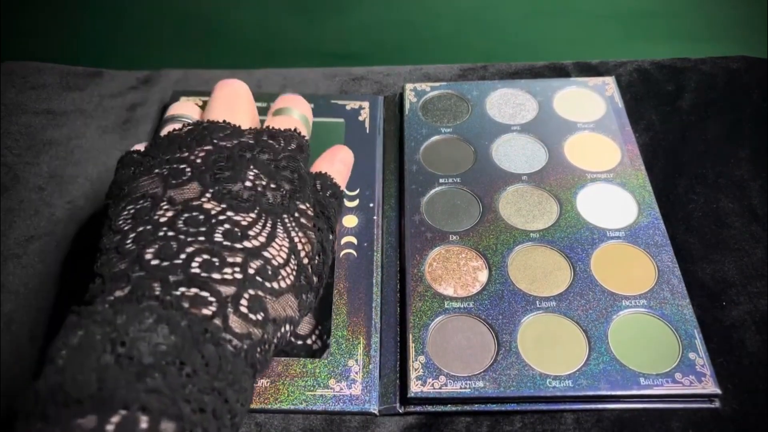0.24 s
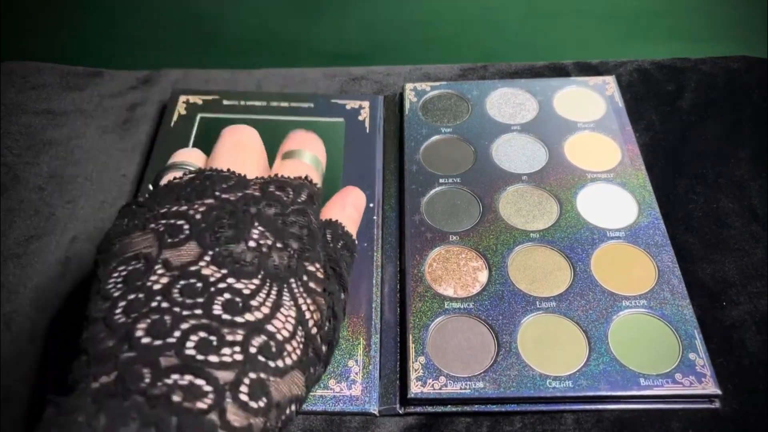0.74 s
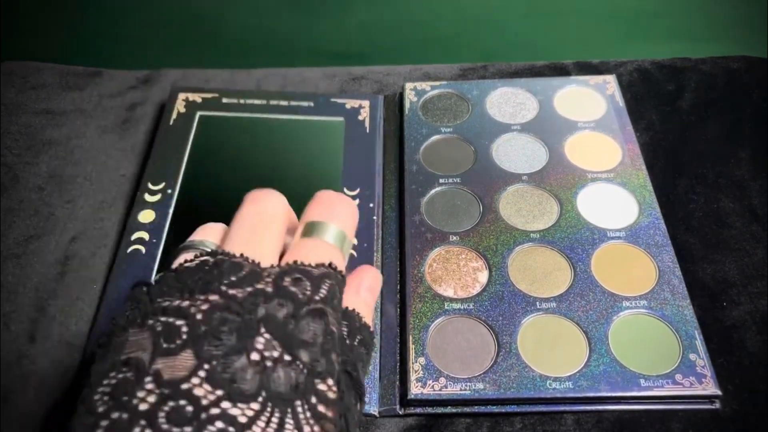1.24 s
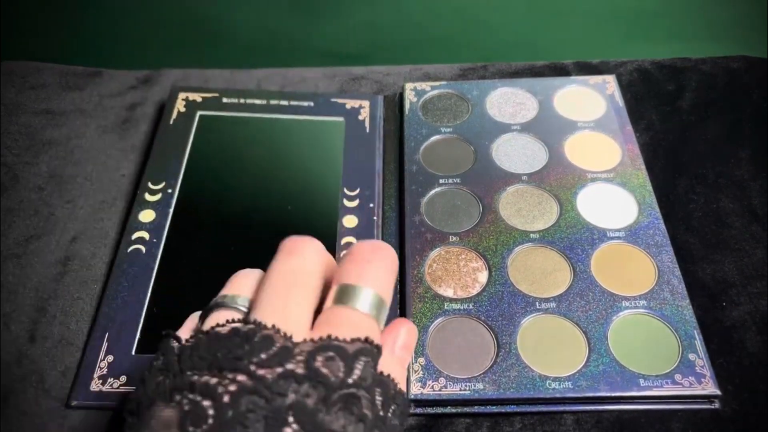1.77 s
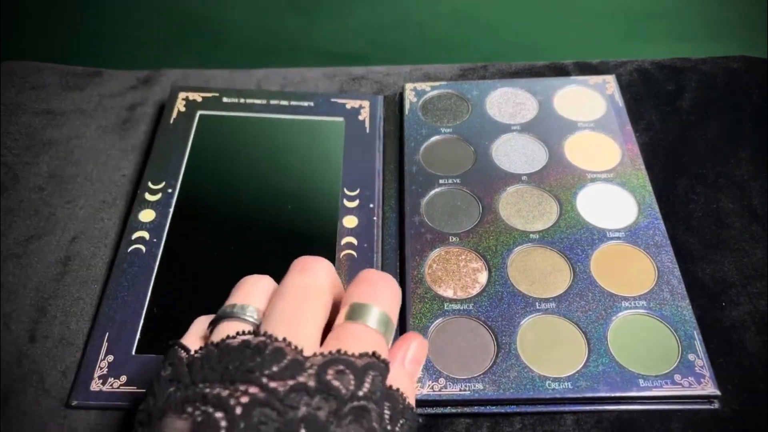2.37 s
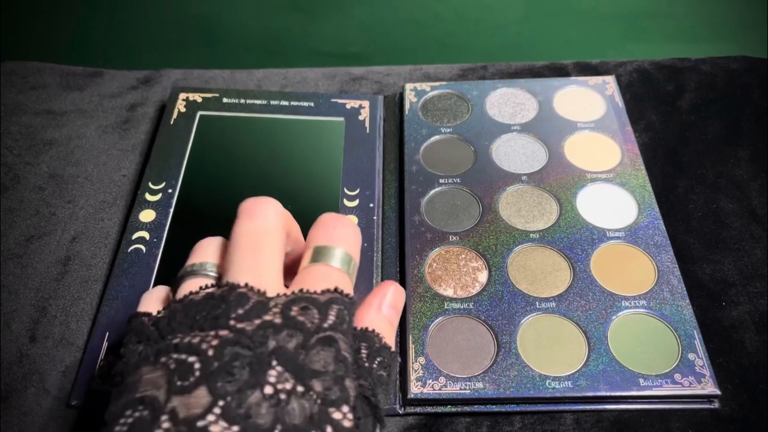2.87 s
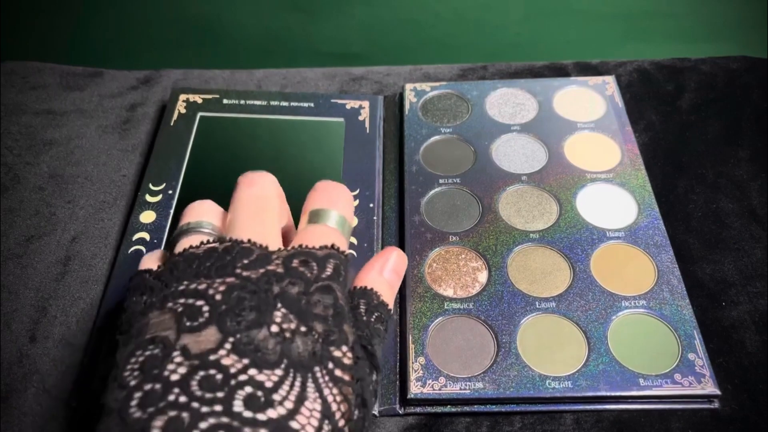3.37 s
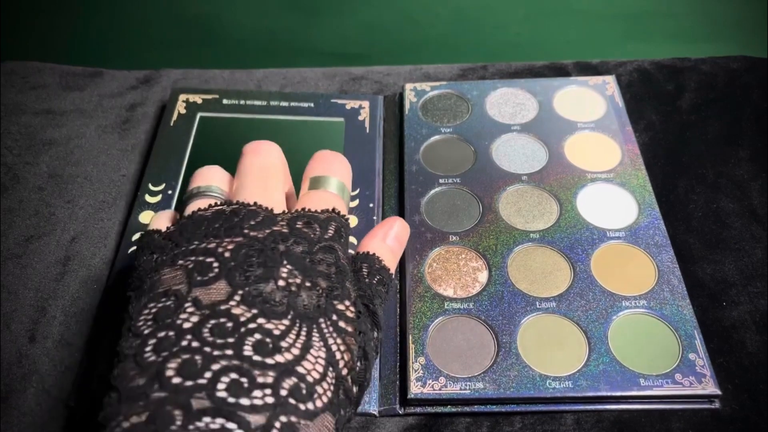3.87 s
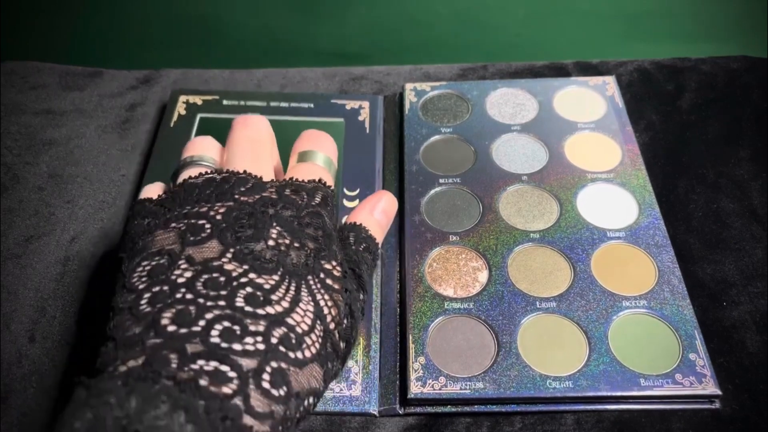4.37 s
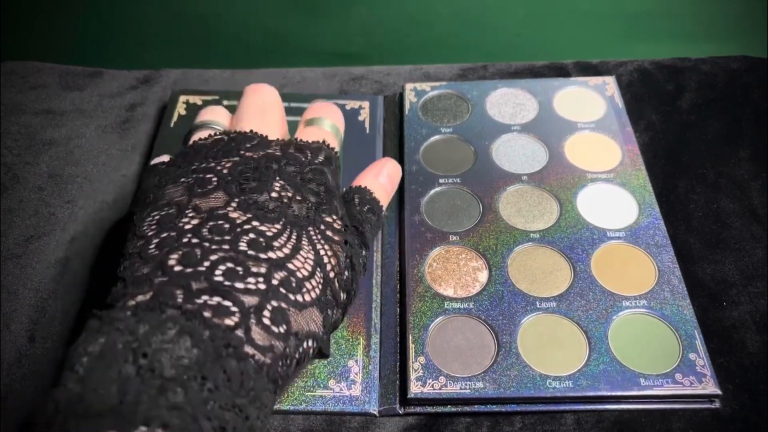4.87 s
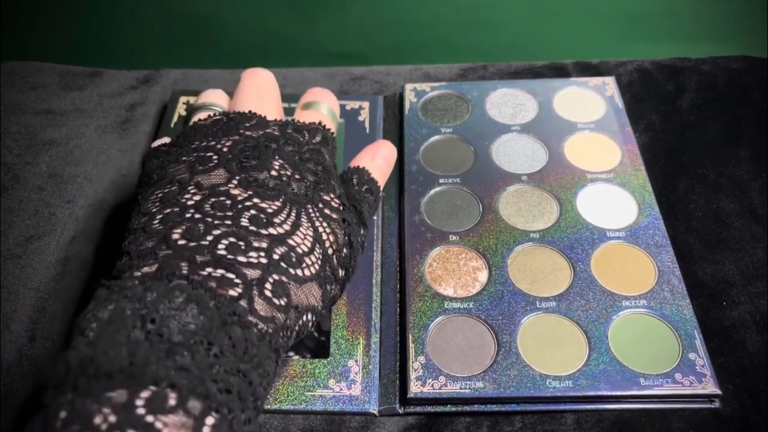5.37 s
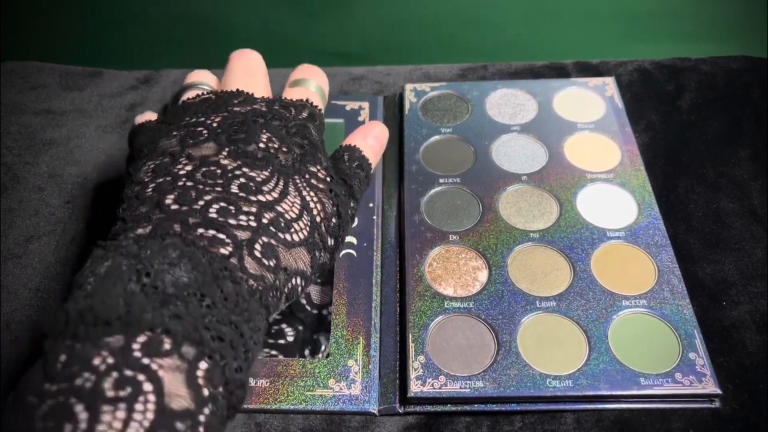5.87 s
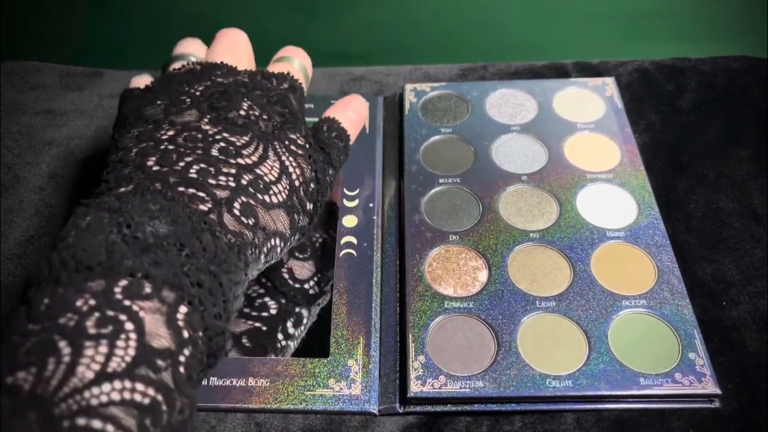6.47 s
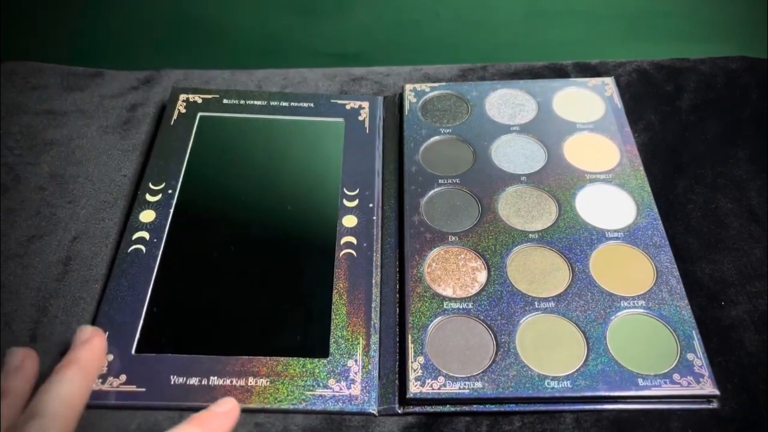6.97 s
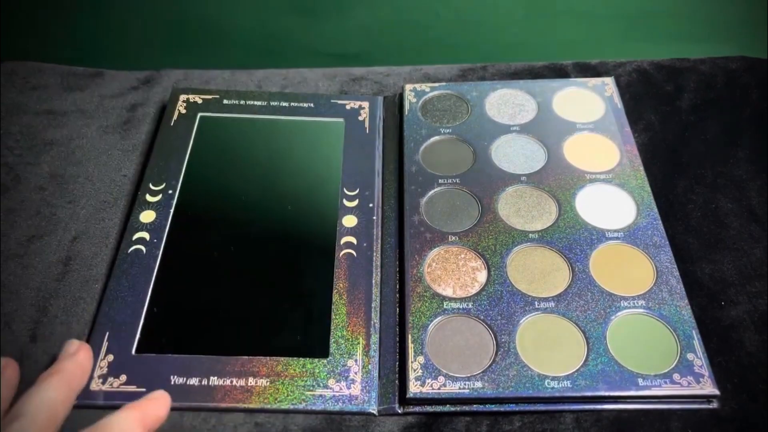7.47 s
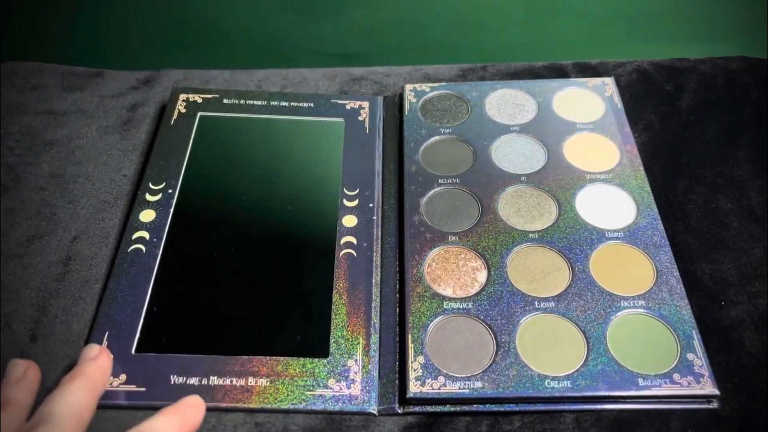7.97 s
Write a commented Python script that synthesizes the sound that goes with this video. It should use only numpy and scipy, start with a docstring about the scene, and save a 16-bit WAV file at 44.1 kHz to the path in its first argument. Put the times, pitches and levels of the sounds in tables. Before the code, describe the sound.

Irregular bursts of hollow, clicky nail taps on a thin board lid, then a light lace swish and a soft settling on cloth.

```python
"""Fingernails drum in quick, uneven clusters on the mirror lid of an open cardboard palette lying on cloth.
Each tap rocks the lid, knocks the damped board, rings the mirror briefly and clicks in the nail itself;
the hand travels down the lid and up again, and the place it strikes sets the pitch and colour of the knock.
Heard close and nearly mono in a small, dry room with a faint hum; the lace sleeve swishes as the hand
leaves, then the hand settles on the cloth. Swinging sines make the rocking, shaped pulses and noise the rest."""
import sys
import numpy as np
from scipy import signal
from scipy.fft import rfft, irfft
from scipy.io import wavfile
from scipy.ndimage import map_coordinates

SR = 44100
rng = np.random.default_rng(int(sys.argv[2]) if len(sys.argv) > 2 else 0)


def unload_wav(signal):
    """Save mono or channel-first audio to the path in sys.argv[1] as 16-bit WAV at rate SR, clipped to [-1, 1]."""
    wavfile.write(
        sys.argv[1],
        SR,
        np.round(np.clip(np.atleast_2d(signal).T, -1, 1) * 32767).astype(np.int16),
    )


N = 362943
SIZE = 8192  # samples in one tap with its room tail
HZ = np.maximum(np.arange(SIZE // 2 + 1) * SR / SIZE, 1)  # frequency of each bin of a tap
TOP_HZ = 15900
AIR_DB, AIR_SIDE_DB = -77 + 10, -77
HUM_HZ, HUM_DB = 190, -75.5
BOARD_WIDTH_HZ = 239
# the lid rocks on the cloth in a slow and a fast mode
FAST_ROCKING_HZ, SLOW_T60_S, FAST_T60_S = 89, 0.069, 0.085
# dB gained per dB: a square hit and a hard nail drive the mirror; a square hit also drives the tick
MIRROR_PER_KNOCK, MIRROR_PER_CLICK, TICK_PER_KNOCK = 0.29, 0.73, 0.14
# the squarer the hit, the lower the mirror rings and the higher the nail clicks
MIRROR_HZ_PER_DB, NAIL_HZ_PER_DB = -5, 39


def undb(db):
    """Decibels to gain."""
    return 10 ** (np.asarray(db) / 20)


def unit(x):
    """Scale to an rms of one."""
    return x / np.sqrt(np.mean(x ** 2))


def curve(rows):
    """Gain over time, interpolated in dB between (time [s], level [dB]) rows."""
    return undb(np.interp(np.arange(N) / SR, *np.transpose(rows)))


def colour(points, hz):
    """Gain over frequency, from (frequency [Hz], level [dB]) points on a logarithmic frequency axis."""
    at, db = np.transpose(points)
    return undb(np.interp(np.log(np.maximum(hz, 1)), np.log(at), db))


def noise(points):
    """Noise of rms one whose spectrum follows the points."""
    white = rfft(rng.standard_normal(N))
    hz = np.arange(N // 2 + 1) * SR / N
    return unit(irfft(white * colour(points, hz), N))


def wander(axis, step):
    """Smooth random values along an axis, a new one every step."""
    return map_coordinates(rng.standard_normal(1024), [axis / step], order=3, mode="wrap")


def background():
    """Room rumble and microphone hiss under a faint hum that wavers in phase and level."""
    # spectrum of the rumble and hiss: (frequency [Hz], relative level per Hz [dB])
    air = [(20, -8.5), (55, 0), (85, -8.5), (150, -14), (190, -3), (240, -12), (330, -18), (500, -22),
           (900, -31), (2000, -32), (6000, -39), (16000, -39.5)]
    t = np.arange(N) / SR
    phase = 2 * np.pi * HUM_HZ * t + 1.0 * wander(t, 0.04)
    hum = np.sin(phase) * undb(4.1 * wander(t, 0.15))
    return noise(air) * undb(AIR_DB) + unit(hum) * undb(HUM_DB)


def sleeve():
    """The moving hand rumbles softly, its lace rustles and slides off the lid, and it settles on the cloth."""
    # movement of hand and sleeve: (time [s], level [dB])
    movement = [(0, 3), (1, 1), (3, 3.5), (4.5, 2.5), (6.6, 1.5), (6.95, -4), (7.2, -4), (7.6, -8.5),
                (7.72, 1.5), (7.85, -8), (8.15, -6.5)]
    # sleeve sliding off the lid: (time [s], level [dB])
    swish = [(6.75, -100), (6.87, -79), (6.96, -74.5), (7.06, -81), (7.3, -99)]
    # the hand settling on the cloth: (time [s], level [dB])
    settling = [(7.7, -100), (8.0, -81), (8.15, -67.5), (8.25, -92)]
    t = np.arange(N) / SR
    rumble = noise([(15, -2.5), (32, 0.0), (70, -12.0), (150, -13.5), (400, -27.5), (2000, -63.5),
                    (16000, -81.5)])
    rustle = noise([(100, 0.5), (700, 5.5), (2000, -2.0), (6000, -4.5), (16000, -7.5)])
    slide = noise([(1000, -17.0), (4500, -8), (7500, -3), (10000, -12.5), (16000, -23)])
    brush = noise([(40, 2.5), (90, -5.0), (180, 2.5), (400, 2.5), (700, -18.5), (3000, -33.5), (16000, -50)])
    moving = rumble * undb(-63.0 + 4.5 * wander(t, 0.066))
    moving += rustle * undb(-77.0 + 0.61 * wander(t, 0.18))
    return moving * curve(movement) + slide * curve(swish) + brush * curve(settling)


def lid_at(s, table):
    """The lid's answer at the place that the hand has reached."""
    # where the fingers land: (time [s], place on the lid [0 near edge to 1 far edge])
    reach = [(0, 0.87), (.25, 0.67), (.7, 0.62), (1.2, .33), (1.8, 0.084), (2.45, 0.039), (2.9, 0.3),
             (3.35, 0.43), (3.85, 0.57), (4.3, .7), (5.35, 0.76), (5.72, 0.85), (5.9, 0.86), (6.8, 0.94)]
    place = np.interp(s, *np.transpose(reach))
    places, *columns = np.transpose(table)
    return [np.interp(place, places, column) for column in columns]


def rocking(slow_hz, fast_db, detune=0.035):
    """The lid sinks into the cloth and swings back: two decaying sines, the fast one set by the place hit."""
    t = np.arange(SIZE) / SR
    modes = [(slow_hz, SLOW_T60_S, 0), (FAST_ROCKING_HZ, FAST_T60_S, fast_db)]
    swing = np.zeros(SIZE)
    for (hz, t60, db), shift in zip(modes, rng.standard_normal(2)):
        decay = undb(db - 60 * t / t60)
        swing += decay * np.sin(2 * np.pi * hz * (1 + detune * shift) * t)
    onset = 1 - np.exp(-t / 0.002)
    return unit(swing * onset) / np.sqrt(SIZE)  # total energy of one


def resonances(modes, detune, scatter_db):
    """Gain of damped modes over frequency; each blow shifts them a little and may favour some."""
    power = 0
    for (hz, width, db), (shift, luck) in zip(modes, rng.standard_normal((len(modes), 2))):
        centre = hz * (1 + detune * shift)
        off = (HZ / centre - centre / HZ) * centre / width
        gain = undb(db + scatter_db * luck) / (1 + off ** 2) ** 1.13
        power = power + gain ** 2
    return np.sqrt(power)


def favour(hz, width_hz, rest_db):
    """The place of the blow drives the modes near one frequency harder than the rest."""
    return undb(rest_db) + 1 / (1 + ((HZ - hz) / width_hz) ** 2)


def strike(gain):
    """The sharpest causal pulse that has this spectrum (minimum phase, by folding the cepstrum)."""
    cepstrum = irfft(np.log(gain + 1e-4 * gain.max()))
    cepstrum[1:SIZE // 2] *= 2
    cepstrum[SIZE // 2 + 1:] = 0
    return irfft(np.exp(rfft(cepstrum)))


def tap(s, strength_db, rocking_db, flex_db, knock_db, click_db):
    """One nail landing: rocking minus a pulse of board, mirror and nail; levels are rms over 10 ms."""
    # pitches that a blow favours along the lid: (place [0-1], slow rocking [Hz], flex [Hz], board [Hz],
    # knock [Hz], mirror [Hz], nail [Hz])
    lid_pitch = [(0, 47.16, 333.7, 455, 870, 1663, 4100), (.3, 52, 184.3, 435.5, 914, 1874, 4750),
                 (.55, 46.4, 188.2, 486, 1045, 1530, 4400), (.8, 37, 224.4, 567, 1046, 1580, 4400),
                 (1, 63, 238, 360, 1150, 1720, 3300)]
    # levels along the lid; at the far end the nails land on their edges:
    # (place [0-1], fast rocking [dB], mirror [dB], tick [dB], top octave [dB])
    lid_level = [(0, -13.5, 2, -15.5, -4), (.3, -7.5, -2, -7.5, -7.5), (.55, -3, -5.5, -12, -3),
                 (.8, 8, 3.5, -10, 5), (1, -5, 0.5, -18.5, 2)]
    # resonances of the lid flexing, knocked and in its mirror: (frequency [Hz], width [Hz], relative level [dB])
    flex_modes = [(158.5, 84, 0), (240.3, 64, -3.5), (367.5, 170, -6)]
    knock_modes = [(825, 200, 2.5), (1098, 450, 0), (1330, 220, -2)]
    mirror_modes = [(1487, 440, 0.0092), (1852, 320, 0)]
    # contact click of a nail, and its higher tick: (frequency [Hz], relative level [dB])
    click_colour = [(1300, -20.5), (2100, 4), (2500, 6), (4000, -3.5), (5800, -3), (7500, -12),
                    (12000, -31.5)]
    tick_colour = [(4500, -18), (7200, 2), (9500, 0), (12500, -0.5), (16000, -13)]

    slow_hz, flex_hz, board_hz, knock_hz, mirror_hz, nail_hz = lid_at(s, lid_pitch)
    fast_db, mirror_db, tick_db, top_db = lid_at(s, lid_level)
    mirror_hz += MIRROR_HZ_PER_DB * knock_db
    nail_hz += NAIL_HZ_PER_DB * knock_db
    mirror_db += MIRROR_PER_KNOCK * knock_db + MIRROR_PER_CLICK * click_db
    tick_db += click_db + TICK_PER_KNOCK * knock_db

    flex = resonances(flex_modes, detune=0.072, scatter_db=2.5) * favour(flex_hz, 60, -7.5)
    board = resonances([(board_hz, BOARD_WIDTH_HZ, 0)], detune=0.012, scatter_db=0)
    knock = resonances(knock_modes, detune=0.02, scatter_db=0.0) * favour(knock_hz, 230, -13.5)
    knock /= np.hypot(1, (HZ / 1400) ** 10)  # soft cardboard damps its higher modes
    mirror = resonances(mirror_modes, detune=0.012, scatter_db=2.5) * favour(mirror_hz, 190, -12.5)
    nail = colour(click_colour, HZ) * favour(nail_hz, 890, 1.8)
    tick = colour(tick_colour, HZ) * colour([(8500, 0), (12000, top_db)], HZ)

    parts = [(flex, flex_db), (board, 0), (knock, knock_db),
             (mirror, mirror_db), (nail, click_db), (tick, tick_db)]
    power = sum((unit(gain) * undb(db)) ** 2 for gain, db in parts)
    click = strike(np.sqrt(power))
    # the lid is pushed away from the microphone, so the pressure drops first
    blow = undb(rocking_db) * rocking(slow_hz, fast_db) - click
    return undb(strength_db) * blow * np.sqrt(SR / 100)  # unit energy to unit rms over 10 ms


def chatter(click, db=-10, t60=0.016, low_hz=1400):
    """The nail skids and settles: tiny further contacts roughen the first milliseconds."""
    t = np.arange(SIZE) / SR
    envelope = undb(-60 * t / t60) * (1 - np.exp(-t / 0.00038))
    contacts = rng.standard_normal(SIZE) ** 3 * envelope  # cubing makes the noise spiky
    contacts = signal.sosfilt(signal.butter(2, low_hz, "high", fs=SR, output="sos"), contacts)
    rough = signal.fftconvolve(click, unit(contacts))[:SIZE] / np.sqrt(SIZE)
    return click + undb(db) * rough


def beam(x, ripple_db=2.5):
    """Towards the microphone the dense upper modes add or cancel, differently at every tap."""
    upper = np.clip(HZ / 1500 - 1, 0, 1)
    ripple = ripple_db * (wander(HZ, 250) + wander(HZ, 609)) * upper
    return signal.fftconvolve(x, strike(undb(ripple)))[:SIZE]


def room(x, build_s=0.012):
    """A few early echoes off nearby surfaces and a short diffuse tail of decaying noise bands."""
    # nearby surfaces: (delay [s], level [dB])
    echoes = [(0.0126, -33), (.0180, -32), (0.022, -29)]
    # diffuse room sound: (frequency [Hz], level [dB], decay by 60 dB before the build-up [s])
    room_bands = [(100.2, -8.5, 0.23), (397, -11, 0.077), (930, -13, 0.16), (1750, -15.5, 0.19),
                  (2673, -17, 0.18), (5900, -14.5, 0.21), (13000, -11.5, 0.16)]
    t = np.arange(SIZE) / SR
    hiss = rfft(rng.standard_normal(SIZE))
    centres = np.log([row[0] for row in room_bands])
    # the tail thickens around build_s
    build = 1.2 + 1 / (1 + np.exp(np.minimum((build_s - t) / 0.0035, 20)))
    response = np.zeros(SIZE)
    for (hz, db, t60), own in zip(room_bands, np.eye(len(room_bands))):
        band = irfft(hiss * np.interp(np.log(HZ), centres, own))  # crossfades into its neighbours
        response += undb(db) * band * unit(build * undb(-60 * t / t60)) / np.sqrt(SIZE)
    for (delay, db), shift in zip(echoes, rng.standard_normal(len(echoes))):
        response[int(delay * (1 + 0.015 * shift) * SR)] += undb(db)
    return signal.fftconvolve(x, response)[:len(x)]


def fingers():
    """All taps in turn, each as direct sound plus its answer from the room."""
    # taps: (time [s], strength [dB]; then relative to it: rocking of the lid [dB], flexing [dB],
    # knock of a square hit [dB], click of the nail [dB])
    taps = [(0.0355, -44, -3.5, 1.0, -6.5, -4.5), (0.0998, -34.5, -5, -5, -14.5, -11),
            (0.1944, -44, 2.5, -1.5, -5.5, -6.0), (0.2427, -33.5, -2.5, -4.5, -4.5, -13.0),
            (0.554, -58, 11, 8.5, 0.5, 1.5), (0.595, -46, 3.0, 2.0, -4.5, -5.5),
            (0.7196, -40.5, 0, 1.5, -3.5, -7.5), (0.7825, -45, 8.5, 1.5, 0, -7),
            (1.158, -30.5, -1, -5.5, -7.5, -16.5), (1.1719, -47.5, -3, -5, -7, -10),
            (1.2644, -36, 1, -3, -3.5, -15), (1.379, -73.5, 37.5, 4, 4, 3),
            (1.6714, -38, 5, -1.5, -10.5, -17), (1.7406, -36.0, 5.5, -2, -5.5, -16),
            (1.839, -32.0, -2.5, -4.5, -7.5, -15), (1.9122, -45.5, 19.5, 1.5, 7.0, 6.5),
            (2.1669, -38.5, 6.5, -0.5, -8.5, -17), (2.1829, -34, 3.5, -4.5, -5.5, -13.5),
            (2.3006, -42.0, 9, 2, -4.5, -8), (2.474, -55, 27.5, 10.5, 10.0, 8),
            (2.7632, -35.0, 3.5, -7, -9, -13.0), (2.8555, -38.5, 5, -3, -5.5, -15.5),
            (2.905, -26, -3.5, -9.5, -2.5, -18.5), (3.0252, -21.5, -4.5, -8, -4, -21.5),
            (3.2158, -47, 9, -2.0, -2, -9), (3.3116, -44.0, 6, -0.5, -3, -10.0),
            (3.3803, -32.5, 1, -5.5, -1.5, -13.5), (3.463, -64.5, 17.0, -8.5, -2, -15.5),
            (3.71, -51, 9, 0, -1.5, -5), (3.7821, -35.5, 2.5, -2.5, -0.5, -7.5),
            (3.8694, -29.5, -3.5, -4, -1, -13), (3.9375, -41, 6, 1, 3.0, -9),
            (4.1939, -56, 11.5, 1, -1, -2), (4.311, -30.0, -4.5, -6.0, -5.5, -12.5),
            (4.4341, -64.5, 10, -5, 3, -4), (4.7046, -42.5, -2.5, 2.5, -6, -5),
            (4.8027, -45.5, 3, 0, -7.5, -5.5), (4.8582, -33.5, -0.5, -6.5, 1.5, -11),
            (4.8815, -32.5, -0.5, -3, 2.5, -11.5), (5.1664, -56.0, 1.5, 6, -6.5, -3.5),
            (5.2575, -44.5, 0.5, -7.5, -7, -6), (5.3394, -30, -3, -10, -1.5, -12),
            (5.3754, -39, 3, -6.5, 2.0, -11), (5.6831, -50, 7.5, -3.0, -4, -2),
            (5.7447, -41.5, 4, -5, -5.5, -4), (5.8026, -44, 4.5, 1, -4.5, -2.5),
            (5.9004, -50, 8.5, 3, -3.5, -5.0), (6.1358, -56, 11, -2.0, -9.5, -3.5),
            (6.1973, -44.5, 5.5, 2, -1.5, -0.5), (6.299, -42, 4.5, 2.5, -8.5, 0.5),
            (6.477, -86, 34, -4.0, -4, 16), (6.669, -48.5, 11, 1.5, -6, -2.5),
            (6.769, -52, 9, 5.5, -2, 0.5), (6.8174, -41.5, 6.5, 2, -15, -4.0),
            (6.8355, -38.5, -3, -0.5, -14.5, -11.5)]
    out = np.zeros(N + SIZE)
    for s, *blow in taps:
        start = int(s * SR)
        sound = tap(s, *blow)
        out[start:start + SIZE] += beam(chatter(sound)) + room(sound)
    return out[:N]


def scene():
    """Taps and sleeve sit in the centre; only the room's background has some width."""
    # the part of the background that differs between left and right:
    # (frequency [Hz], relative level per Hz [dB])
    air_side = [(20, -21.5), (60, -13), (150, -17), (380, -15.5), (825, -25), (3300, -36.5), (8000, -51.5),
                (16000, -62.5)]
    mid = background() + sleeve() + fingers()
    side = noise(air_side) * undb(AIR_SIDE_DB)
    return np.array([mid + side, mid - side])


def record(dry):
    """The recorder cuts the top: a steep elliptic low-pass."""
    return signal.sosfilt(signal.ellip(8, 0.2, 70, TOP_HZ, fs=SR, output="sos"), dry)


dry = scene()
out = record(dry)
unload_wav(out)
```